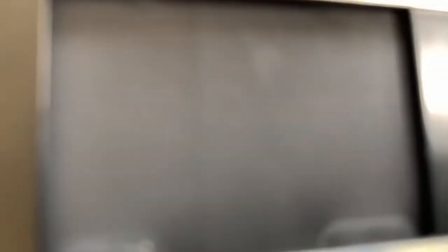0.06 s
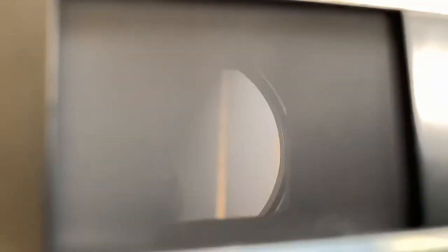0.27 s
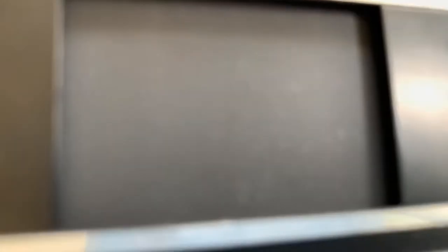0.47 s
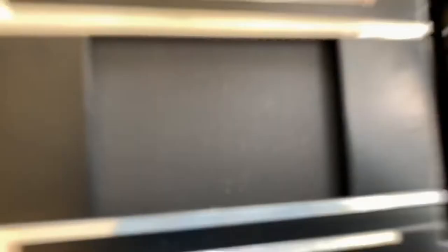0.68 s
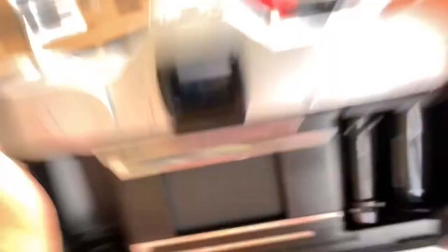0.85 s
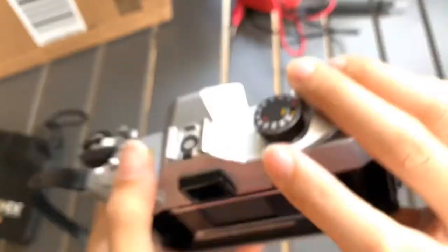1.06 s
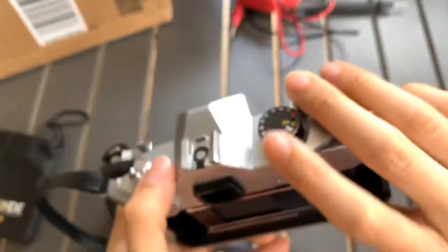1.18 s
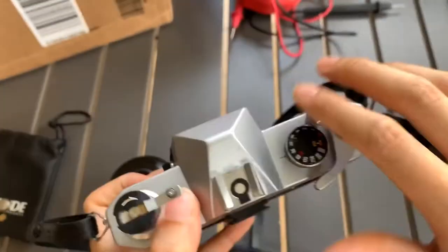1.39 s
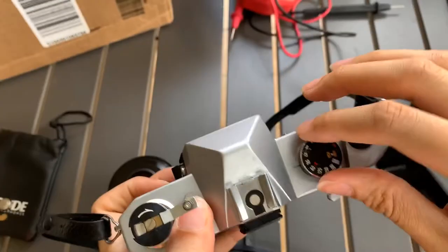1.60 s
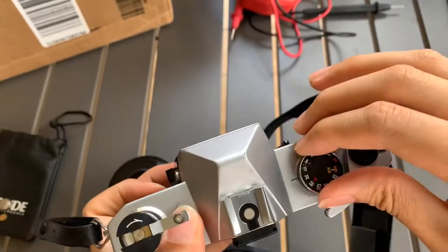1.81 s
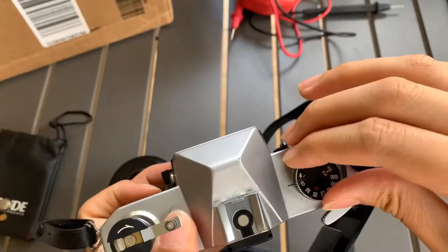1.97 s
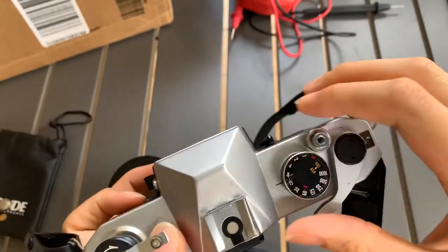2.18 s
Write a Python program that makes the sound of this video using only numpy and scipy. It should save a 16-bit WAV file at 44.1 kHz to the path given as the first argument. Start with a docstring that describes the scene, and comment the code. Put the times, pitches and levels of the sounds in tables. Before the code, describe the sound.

A mechanical film camera shutter fires very close with a loud, rapid metallic clack and ringing spring chatter; then the advance lever is wound with a short gear rasp, followed by faint handling ticks in a quiet room.

```python
"""A mechanical SLR camera is fired close to the microphone in a small, quiet room with a motor's hum.
Mirror and shutter curtains slam in quick succession, their impacts exciting resonances; the springs ring
and chatter on. Loose metal ticks, then a hand slides over the body as the advance lever is wound by
stick-slip of its gears. More ticks follow, the lever swings back, and a finger touches it; after further
ticks a second stroke begins with filtered rubbing and a thin squeak of narrow noise bands."""
import sys
import numpy as np
from scipy import signal
from scipy.fft import rfft, irfft
from scipy.io import wavfile
from scipy.ndimage import uniform_filter1d, minimum_filter1d

SR = 44100
rng = np.random.default_rng(int(sys.argv[2]) if len(sys.argv) > 2 else 0)


def inscribe(sig):
    """Save sig as 16-bit PCM at rate SR to the path in sys.argv[1].

    A 1-D sig is mono; a 2-D sig holds one channel per row.
    Samples are clipped to [-1, 1] before scaling.
    """
    pcm = np.round(np.clip(np.atleast_2d(sig).T, -1, 1) * 32767)
    wavfile.write(sys.argv[1], SR, pcm.astype(np.int16))


N = 99225  # samples in the scene


def amp(db):
    """Logarithmic level: decibels become a linear gain."""
    return 10 ** (np.asarray(db) / 20)


def unit(x):
    """Power normalisation: scale to rms 1."""
    return x / np.sqrt(np.mean(x ** 2) + 1e-18)


def colour(x, points):
    """Minimum-phase filtering: a causal filter through (Hz, dB) points that keeps the power of white noise."""
    hz, db = np.array(points).T
    f = np.arange(N + 1) * SR / (2 * N)
    magnitude = unit(amp(np.interp(np.log(f + 1), np.log(hz), db)))
    cepstrum = irfft(np.log(magnitude))
    # folding the cepstrum onto positive time makes the filter causal
    cepstrum[1:N] *= 2
    cepstrum[N + 1:] = 0
    response = np.exp(rfft(cepstrum))
    return irfft(rfft(x, 2 * N) * response)[:N]


def convolve(x, response):
    """Linear superposition: every sample of a sound starts a response of unit energy."""
    energy = np.sum(response ** 2)
    return signal.fftconvolve(x, response / np.sqrt(energy))[:N]


def resonate(x, modes):
    """Modal synthesis: damped sines of (Hz, width Hz, dB), wider ones dying sooner, driven by a sound."""
    t = np.arange(N // 3) / SR
    response = np.zeros(len(t))
    for k, (hz, width, db) in enumerate(modes):
        sign = (-1) ** k  # neighbours alternate in polarity
        decaying = np.exp(-np.pi * width * t) * np.sin(2 * np.pi * hz * t)
        response += sign * amp(db) * width * decaying
    return convolve(x, response)


def contact(start, rise, hold, decay):
    """Broadband impact: a brief chatter of metal on metal with an even spectrum and a smooth envelope."""
    t = np.arange(SR // 20) / SR
    env = np.minimum(t / rise, 1) * np.exp(-np.maximum(t - rise - hold, 0) / decay)
    x = rng.standard_normal(len(t))
    for _ in range(2):
        # flatten the spectrum, then the local power
        spectrum = rfft(x * env)
        x = irfft(spectrum / (abs(spectrum) + 1e-12), len(t))
        power = np.abs(uniform_filter1d(x ** 2, size=64))
        x = x / np.sqrt(power + 1e-18)
    return np.concatenate([np.zeros(int(start * SR)), x * env, np.zeros(N)])[:N]


def curve(points):
    """Amplitude envelope: gain interpolated in dB along (s, dB) points, -120 dB outside them."""
    s, db = np.array(points).T
    return amp(np.interp(np.arange(N) / SR, s, db, left=-120, right=-120))


def grains(per_s=1800, spread_db=4):
    """Stick-slip friction: dense, uneven micro-slips as random impulses, scaled to rms 1."""
    hit = rng.random(N) < per_s / SR
    sign = np.sign(rng.standard_normal(N))
    strength = amp(spread_db * np.clip(rng.standard_normal(N), -2, 2))
    return unit(hit * sign * strength)


# spectrum of the room noise: frequency_hz, level_db
AIR_SPECTRUM = [(12, -19), (25, -3.5), (45, -8), (68, -19.5), (97, -5), (125, -18), (200, -18.5),
                (320, -20), (640, -24), (800, -26), (1300, -31), (2900, -34.5), (6000, -44), (16000, -56.5)]
# steady tones of the motor: pitch_hz, level_db
HUM_TONES = [(48.4, -57.5), (96.5, -57.5), (199, -65.5), (586.8, -70.5), (624.5, -64), (802.1, -70.5),
             (834.4, -72.5)]
AIR_DB = -49


def background():
    """Stationary noise and steady tones: low room noise with the hum of a motor."""
    t = np.arange(N) / SR
    air = amp(AIR_DB) * colour(rng.standard_normal(N), AIR_SPECTRUM)
    hum = np.zeros(N)
    for hz, db in HUM_TONES:
        phase = rng.random()  # in cycles
        hum += amp(db) * np.sqrt(2) * np.sin(2 * np.pi * (hz * t + phase))
    return air + hum


# early reflections and diffuse tail, spectrum: frequency_hz, level_db
ROOM_SPECTRUM = [(100, -21.5), (500, -1), (1200, 0), (3000, -3), (8000, 1.5), (16000, -1)]
ROOM_T60_S, ROOM_DB = 0.38, -17
EARLY_DB, EARLY_DECAY_S, EARLY_DELAY_S = -14.5, 0.0057, .009


def room(x):
    """Reverberation as decaying noise: early reflections from the table and a short diffuse tail."""
    t = np.arange(N // 2) / SR
    arrived = t > EARLY_DELAY_S
    early = convolve(x, arrived * rng.standard_normal(len(t)) * np.exp(-t / EARLY_DECAY_S))
    tail = convolve(x, arrived * rng.standard_normal(len(t)) * np.exp(-np.log(1000) * t / ROOM_T60_S))
    return x + colour(amp(EARLY_DB) * early + amp(ROOM_DB) * tail, ROOM_SPECTRUM)


# rubbing as the second stroke starts: time_s, level_db
RUB_LEVEL = [(2.06, -73.5), (2.14, -66), (2.16, -50), (2.2, -47.5), (2.25, -50)]
# spectrum of rubbing and touch: frequency_hz, level_db
RUB_SPECTRUM = [(400, -18), (1400, -8), (2200, 1.5), (3000, -4), (4300, -12.5), (8000, -19.5), (12000, -27),
                (16000, -28)]
# resonances of the squeak: pitch_hz, width_hz, level_db
SQUEAK_MODES = [(10100, 64, 1), (12100, 54, -3), (12900, 50, 0), (14040, 80, -9)]
SQUEAK_S, SQUEAK_RISE_S, SQUEAK_DB = 2.053, 0.08, -60.5


def second_stroke():
    """Friction and narrow-band resonance: the lever starts to move again, rubbing and squeaking thinly."""
    rub = colour(grains() * curve(RUB_LEVEL), RUB_SPECTRUM)
    onset = np.clip((np.arange(N) / SR - SQUEAK_S) / SQUEAK_RISE_S, 0, 1)
    squeak = onset * resonate(rng.standard_normal(N), SQUEAK_MODES)
    return rub + amp(SQUEAK_DB) * squeak


# light ticks of loose metal: start_s, level_db, ring_db (relative to the tick)
TICK_EVENTS = [(0.699, -34, -22), (0.7033, -45, -4), (0.711, -55, 6), (1.2446, -53, 4), (1.25, -57, 4),
               (1.2597, -44.5, -26), (1.265, -55, 6.5), (1.283, -61, 4), (1.299, -67, 3),
               (1.315, -59, -8.5), (1.9669, -60, -1), (1.983, -40.5, -3.5), (1.9939, -43.5, 1),
               (2.004, -47, 0), (2.019, -49, 0), (2.029, -57, -2), (2.0495, -54, 0)]
# spectrum of a tick's snap: frequency_hz, level_db
TICK_SPECTRUM = [(1000, -49), (2800, -4), (3700, 6.5), (5200, -1), (7500, 4), (9000, -3), (11000, 3.5),
                 (13500, -26), (15500, 1.5)]
# resonances of the small parts: pitch_hz, width_hz, level_db
TICK_RESONANCES = [(4050, 160, 5.5), (4560, 142, -5.5), (6400, 88, 1), (7800, 160, 0.5), (8300, 240, 1),
                   (11150, 210, -2.5), (12100, 44, 2), (14000, 250, -7)]
TOUCH_S, TOUCH_DB = 1.8916, -51


def handling():
    """Impact excitation of small parts: loose metal ticks as the camera is turned; a finger touches the lever."""
    snap, ring = np.zeros(N), np.zeros(N)
    for s, db, ring_db in TICK_EVENTS:
        tick = amp(db) * contact(s, rise=0.00044, hold=.0012, decay=0.0035)
        snap += tick
        ring += amp(ring_db) * tick
    touch = contact(TOUCH_S, rise=0.0035, hold=.004, decay=.005)
    ticks = colour(snap, TICK_SPECTRUM) + resonate(ring, TICK_RESONANCES)
    return ticks + amp(TOUCH_DB) * colour(touch, RUB_SPECTRUM)


# hand sliding over the camera body: time_s, level_db
GRIP_LEVEL = [(.68, -68), (.75, -52.5), (.81, -46), (.86, -43.5), (.93, -44), (1.04, -49), (1.12, -64.5),
              (1.2, -58.5), (1.26, -56.5)]
# spectrum of the sliding hand: frequency_hz, level_db
GRIP_SPECTRUM = [(100, -12.5), (250, -7.5), (350, -0.5), (700, 0.5), (1300, 0), (2000, -5), (3500, -15),
                 (8000, -23.5), (16000, -30.5)]


def grip():
    """Sliding friction: micro-slips of the hand on the body, filtered to a dull rub."""
    return colour(grains() * curve(GRIP_LEVEL), GRIP_SPECTRUM)


# force on the gears in the stroke, the run-out and the lever's return, each: time_s, level_db
STROKE_FORCE = [(.72, -82), (.80, -57), (.838, -38.5), (.853, -39), (.872, -34), (.895, -35), (.912, -34),
                (.93, -65)]
RUN_OUT_FORCE = [(.905, -74), (0.915, -33), (.94, -32), (0.96, -36), (.975, -32.5), (1.0, -34.5),
                 (1.025, -44.5), (1.06, -77), (1.128, -68)]
RETURN_FORCE = [(1.43, -69), (1.45, -55), (1.461, -44), (1.48, -39.5), (1.499, -44.5), (1.51, -47),
                (1.54, -78)]
# resonances of the winding train: pitch_hz, width_hz, stroke_db, run_out_db, return_db
TRAIN_MODES = [(704, 13, -4, -1.5, -31), (804, 24, -10, -4.5, -22), (1167.8, 20, -16.5, 6, -4.5),
               (1319, 31, -9, 1, -20), (1422, 78, -17.5, -1, -15), (1623, 45, -2.5, -8.5, -9.5),
               (1897, 56, 4, -5, -2), (2035, 41, 1, 1.5, -0.5), (2150, 58, -9, -16.5, 0.5),
               (2465, 51, -2.5, -5, -10), (3134, 110, -15, -17.5, -41), (4440, 51, -20.5, -12.5, -29),
               (5405, 95, -16, -18, -29.5)]
# spectrum of the scraping gears: frequency_hz, level_db
SCRAPE_SPECTRUM = [(100, -21.5), (250, -5.5), (500, -13), (1000, -9.5), (2100, 1.5), (3000, -4.5),
                   (3800, -14.5), (6000, -18.5), (9000, -21), (12000, -28.5), (16000, -37.5)]
# scrape relative to the force: stroke_db, run_out_db, return_db
SCRAPE_LEVELS = (-2, -9.5, -9)
# catches of gear teeth and pawl: start_s, knock_pitch_hz, knock_db, ring_db, snap_db
CATCH_EVENTS = [(.8490, 1880, -34, -26.5, -37), (0.8846, 2100, -22, -26, -38),
                (0.8922, 2030, -28, -26, -39.5), (0.9147, 1290, -27.5, -21, -27.5),
                (0.9258, 1300, -29, -28, -33), (0.9714, 1710, -31.5, -30, -46),
                (1.4588, 2110, -42, -52, -50.5), (1.4975, 2000, -35.5, -44, -49)]
# spectrum of a catch's snap: frequency_hz, level_db
SNAP_SPECTRUM = [(300, -24), (1000, 11), (2500, 12), (4000, 0), (7000, 3), (12000, -9), (16000, -25)]
KNOCK_WIDTH_HZ = 150


def lever():
    """Stick-slip driving a resonant train: gears grind through three phases; teeth and pawl catch on the way."""
    phases = (STROKE_FORCE, RUN_OUT_FORCE, RETURN_FORCE)
    out, snap, rings = np.zeros(N), np.zeros(N), np.zeros((3, N))
    for s, hz, knock_db, ring_db, snap_db in CATCH_EVENTS:
        catch = contact(s, rise=.0003, hold=0.00078, decay=0.002)
        phase = int(s > .9) + int(s > 1.2)  # stroke, run-out or return
        rings[phase] += amp(ring_db) * catch
        snap += amp(snap_db) * catch
        out += amp(knock_db) * resonate(catch, [(hz, KNOCK_WIDTH_HZ, 0)])
    for k, force in enumerate(phases):
        slips = grains(per_s=1100) * curve(force)
        modes = [(row[0], row[1], row[2 + k]) for row in TRAIN_MODES]
        out += resonate(slips + rings[k], modes)
        out += amp(SCRAPE_LEVELS[k]) * colour(slips, SCRAPE_SPECTRUM)
    return out + colour(snap, SNAP_SPECTRUM)


# spectrum of the chatter's hiss: frequency_hz, level_db
SHIMMER_SPECTRUM = [(800, -34.5), (2000, -12), (3000, 2), (4500, -2), (6000, 0.5), (8000, -2), (9500, -8.5),
                    (13000, -2.5), (16000, -4.5)]
# resonances of the chattering spring: pitch_hz, width_hz, level_db
COIL_MODES = [(3066, 120, 2), (3370, 82, -7.5), (4420, 110, -0.5), (4560, 60, 2.5), (5100, 97, 2),
              (5650, 180, -7.5), (6800, 150, -4.5), (7320, 180, -3.5), (8000, 130, -5.5), (8680, 170, -3),
              (10070, 140, -10.5), (12900, 400, -14.5)]
SHIMMER_S, SHIMMER_END_S, LOOSE_END_S = .315, .545, 0.657
SHIMMER_DB, SHIMMER_FALL_DB_PER_S = -40.5, 31.5  # level at the start, and its fall
LOOSE_DB = -59  # faint rattle beneath the chatter
HISS_DB, COIL_DB = -2, -2


def shimmer(rise_s=0.017, stop_s=0.012, settle_s=0.04):
    """Repeated micro-impacts: a spring chatters among the later blows, then settles into a faint rattle."""
    t = np.arange(N) / SR
    age = np.maximum(t - SHIMMER_S, 0)
    chatter = amp(SHIMMER_DB - SHIMMER_FALL_DB_PER_S * age)
    chatter *= np.exp(-np.maximum(t - SHIMMER_END_S, 0) / stop_s)
    loose = amp(LOOSE_DB) * np.exp(-np.maximum(t - LOOSE_END_S, 0) / settle_s)
    taps = np.minimum(age / rise_s, 1) * (chatter + loose) * grains()
    return amp(HISS_DB) * colour(taps, SHIMMER_SPECTRUM) + amp(COIL_DB) * resonate(taps, COIL_MODES)


# blows of mirror and curtains: start_s, part struck, level_db, rise_s, hold_s, decay_s,
# then relative to level_db: thud_db, body_db, ring_db, edge_db
BLOW_EVENTS = [(0.2321, "mirror", -6, 0.0012, .003, 0.0022, -18, -12.5, 2.5, 1),
               (.2440, "mirror", -23, 0.0014, 0.0023, 0.006, -10, -5.5, 3, -2),
               (0.2479, "mirror", -11, .0002, .0005, 0.00047, -29.5, 4.5, -9.5, -9),
               (0.2718, "curtain", -8.5, 0.00012, .0025, 0.0022, -32, -8, 6.5, 1.5),
               (0.2935, "return", -20, .0004, .001, 0.0056, -27, -5.5, -7, -1.5),
               (.3020, "curtain", -27, .001, .003, 0.0028, -22, -3, -4.5, 1),
               (0.3114, "return", -11.5, 0.00016, 0.0058, 0.0028, -24, -3, -1, 3.5),
               (0.3194, "return", -30.5, 0.0023, 0.0018, 0.0024, -4.5, -11, 13, -3.5),
               (.3458, "curtain", -21.5, .0006, .001, 0.0012, -20, -8, -1.5, 0),
               (.3853, "curtain", -27.5, .0004, 0.0018, 0.0013, -20.5, -8, -1.5, -1),
               (0.4044, "return", -47.5, 0.00051, .002, 0.0049, -13, 6, -9, 14)]
# spectra of the low thud, the body's knock and the sharp edge, each: frequency_hz, level_db
THUD_SPECTRUM = [(30, 2), (100, 1), (250, -6.5), (450, 0), (700, -7.5), (2000, -49)]
BODY_SPECTRUM = [(150, -29), (400, -15), (600, -15), (800, -2), (1350, 3), (1600, -1.5), (2000, 4.5),
                 (2400, 2.5), (3000, -17.5), (6000, -37)]
EDGE_SPECTRUM = [(500, -38.5), (1500, -14.5), (2700, -1), (3600, 2), (4500, -1), (5500, -3), (7000, -2.5),
                 (9000, -5.5), (12000, -9), (16000, -12)]
# resonances of the rising mirror, the curtain brake and the mirror's rest, each: pitch_hz, width_hz, level_db
MIRROR_MODES = [(1926, 70, -10.5), (2800, 150, -6), (3225, 190, 1), (3740, 130, -8), (4480, 73, -2.5),
                (5710, 90, -8.5), (7080, 140, -3.5), (7530, 110, -4), (10440, 100, -12), (11340, 88, -15)]
CURTAIN_MODES = [(2240, 140, -14.5), (3160, 160, 3.5), (4430, 340, -10.5), (4820, 90, -13),
                 (6600, 120, -10.5), (6975, 100, -8), (7600, 140, -10.5), (11320, 190, -17)]
REST_MODES = [(884, 130, -0.5), (1360, 99, -3.5), (1980, 90, -4), (2335, 110, 3), (3030, 120, 1),
              (4420, 95, 3.5), (6240, 100, -4), (6720, 110, -9), (7500, 140, -2.5), (8170, 90, -8),
              (9820, 90, -12), (12100, 90, -12.5)]
# lasting ring of the springs: pitch_hz, t60_s, level_db
SPRING_MODES = [(1007, .3, -5), (1566, .35, -6.5), (2365, 0.22, -3), (2870, 0.52, -2), (3065, 0.68, -6.5),
                (3920, 0.18, -2), (4400, 0.49, -0.5), (4540, 0.38, 1), (6697, 0.45, -8.5), (7278, .55, -9),
                (7472, .45, -1.5), (8126, .4, -5.5), (10200, .5, -3.5)]
SPRING_DB = -19
RING_SHARE = 0.66  # part of a blow's hold and decay that drives the struck part


def shutter():
    """Impact and modal response: each blow thuds, knocks the body, rings its part and cracks; springs ring on."""
    parts = {"mirror": MIRROR_MODES, "curtain": CURTAIN_MODES, "return": REST_MODES}
    thud, body, edge = np.zeros((3, N))
    ring = {part: np.zeros(N) for part in parts}
    for s, part, db, rise, hold, decay, thud_db, body_db, ring_db, edge_db in BLOW_EVENTS:
        thud += amp(db + thud_db) * contact(s, rise, hold, decay)
        body += amp(db + body_db) * contact(s, rise, hold, decay)
        ring[part] += amp(db + ring_db) * contact(s, rise, RING_SHARE * hold, RING_SHARE * decay)
        edge += amp(db + edge_db) * contact(s, rise, hold, decay)
    clack = colour(thud, THUD_SPECTRUM) + colour(body, BODY_SPECTRUM) + colour(edge, EDGE_SPECTRUM)
    for part, modes in parts.items():
        clack += resonate(ring[part], modes)
    # a resonance's width follows from its 60 dB decay time
    spring_modes = [(hz, np.log(1000) / np.pi / t60, db) for hz, t60, db in SPRING_MODES]
    return clack + amp(SPRING_DB) * resonate(edge, spring_modes)


def scene():
    """Superposition of sources: the camera's sounds pass through the room, the background is added."""
    camera = shutter() + shimmer() + lever() + grip() + handling() + second_stroke()
    return (room(camera) + background())[None]


LIMIT, LIMIT_WINDOW_S = .76, .0006  # limiter threshold (amplitude) and window
TOP_HZ = 15800


def record(dry):
    """Peak limiting and low-pass filtering: a fast limiter holds down the loudest peaks; the top is cut."""
    size = int(LIMIT_WINDOW_S * SR)
    needed = LIMIT / np.maximum(abs(dry), LIMIT)
    gain = uniform_filter1d(minimum_filter1d(needed, size), size)
    # 0.2 dB ripple below the cut, 80 dB rejection above
    low_pass = signal.ellip(10, .2, 80, TOP_HZ, fs=SR, output="sos")
    return signal.sosfilt(low_pass, dry * gain)


dry = scene()
out = record(dry)
inscribe(out)
```